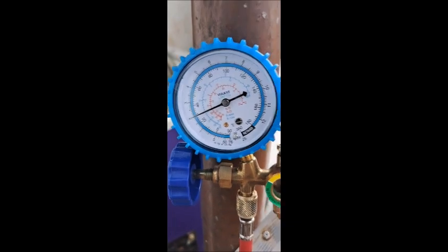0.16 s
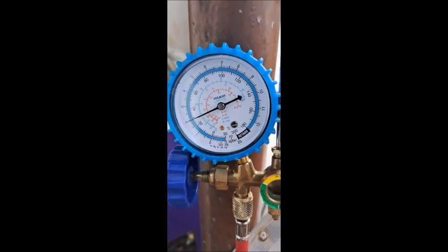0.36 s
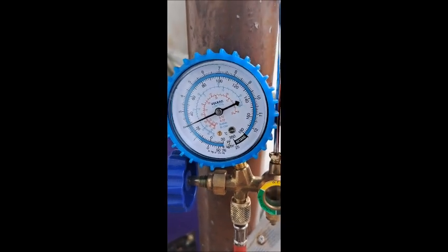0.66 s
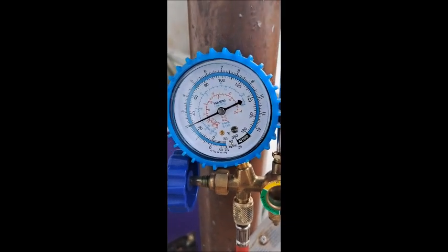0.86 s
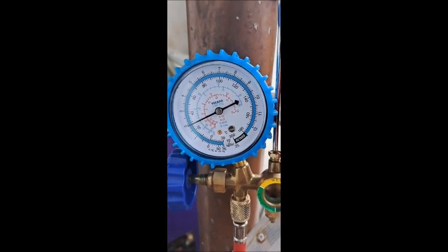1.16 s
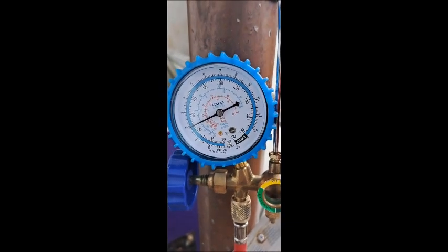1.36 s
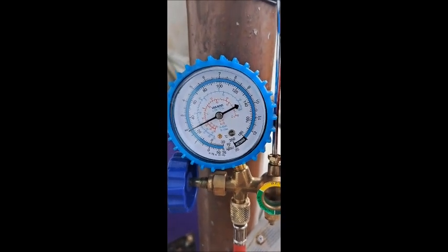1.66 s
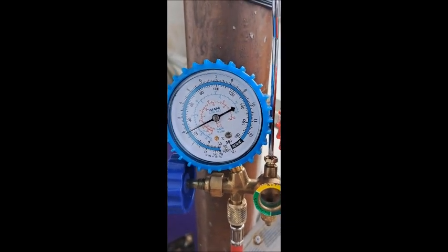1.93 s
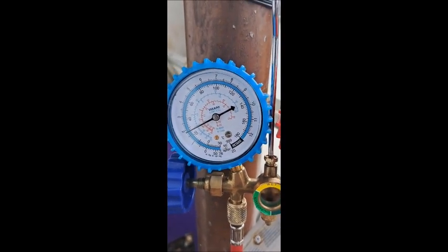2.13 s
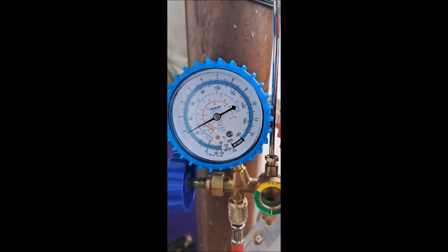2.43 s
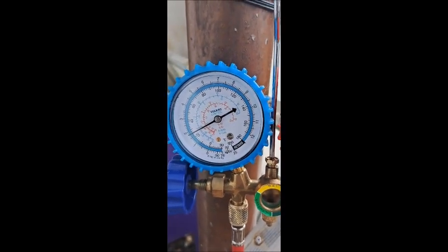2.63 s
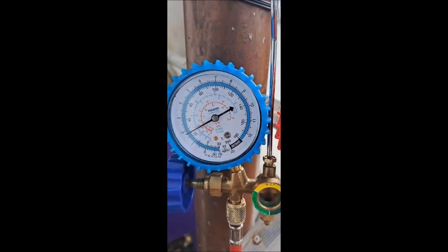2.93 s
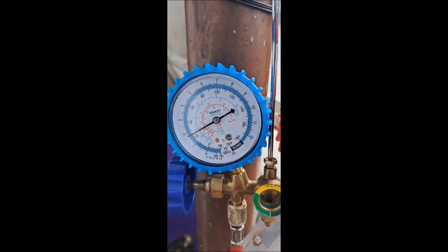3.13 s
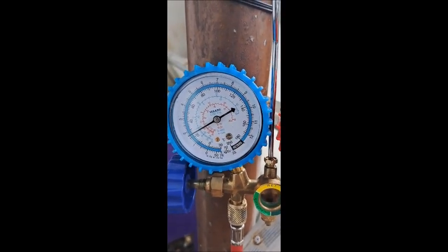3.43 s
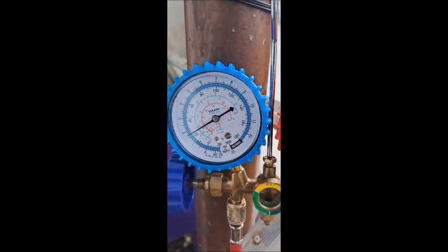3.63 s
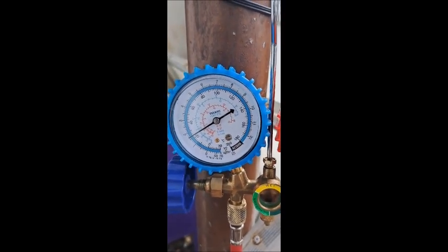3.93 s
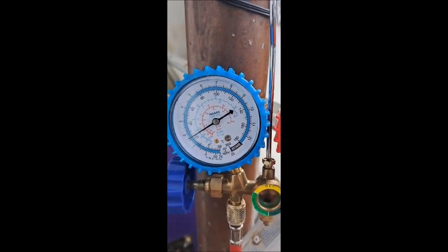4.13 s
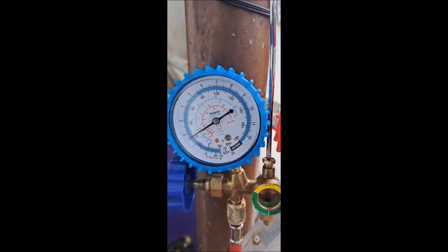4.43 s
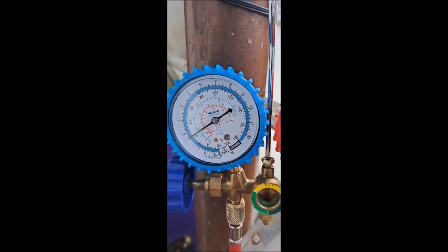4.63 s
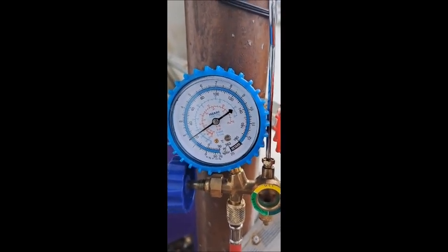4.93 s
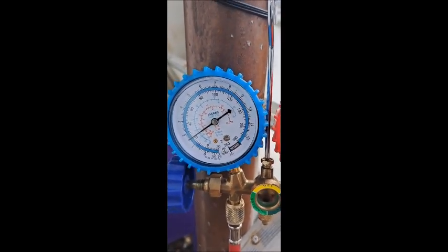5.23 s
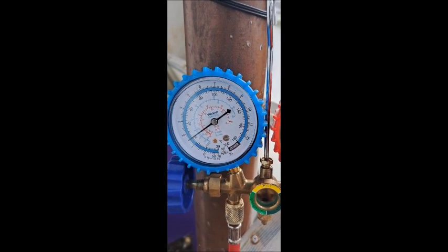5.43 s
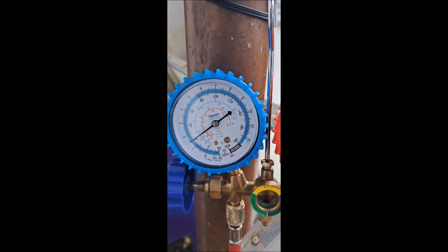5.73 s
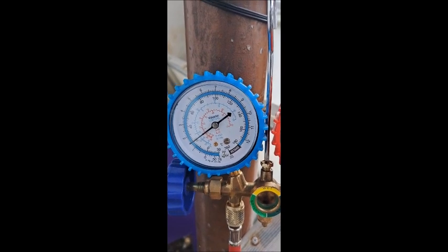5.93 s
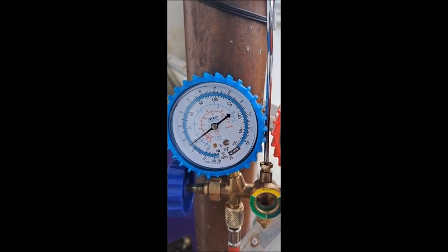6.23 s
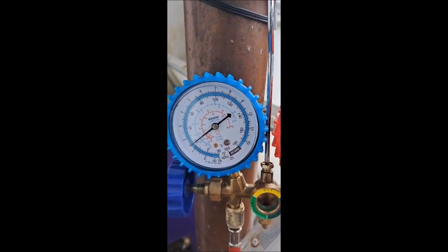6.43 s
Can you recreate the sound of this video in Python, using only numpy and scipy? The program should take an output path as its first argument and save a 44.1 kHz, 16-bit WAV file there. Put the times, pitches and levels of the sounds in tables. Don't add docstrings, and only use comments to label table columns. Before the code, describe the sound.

A wide stereo microphone lies beside a small running freezer, with street noise coming from outside. From 0 seconds a heavy truck pulls away with a very deep, smooth boom near fifty hertz, rising slightly, while another low engine note sags and vanishes within half a second. The compressor hums low and steadily, two close tones beating slowly, with fine rapid valve ticking and faint gas hiss. Small metallic ticks and taps occur throughout, with short liquid gurgles, clustered around 2.4 to 3. At about 2.6 the truck shifts, its boom drops sharply, then surges near 4.4 and 4.9 to 5.2 before easing. A car approaches from 3.2, a gritty click at 3.75, its tyre hiss strongest around 4.25, gone by 5.2. Barely audible birds chirp near 2.6 and 5.7. The freezer's ticking and hiss strengthen towards the end, with a soft light knock at 6.46. Dull road roar continues throughout.

```python
import sys
import numpy as np
from scipy import signal
from scipy.fft import rfft, irfft, next_fast_len
from scipy.io import wavfile
from scipy.ndimage import uniform_filter1d

SR = 44100
rng = np.random.default_rng(int(sys.argv[2]) if len(sys.argv) > 2 else 0)


def convert_level_to_amplitude(level_db):
    exponent = np.asarray(level_db, float) / 20
    return 10 ** exponent


def generate_wav(sig):
    pcm = np.round(np.clip(np.atleast_2d(sig).T, -1, 1) * 32767).astype(np.int16)
    wavfile.write(sys.argv[1], SR, pcm)


N = 290178
TIME = np.arange(N) / SR
FREQ = np.fft.rfftfreq(2 * next_fast_len(N // 2 + 1025), 1 / SR)
SIZE = 2 * (len(FREQ) - 1)
SHAFT_HZ = 58.92

# centre_s, change_db, half_width_s
BOOM_DIPS = [(.125, -6, 0.035), (.38, -2.5, .05), (.77, -1.5, 0.038), (5.42, -2, 0.067), (5.85, 1.5, 0.041),
             (.92, -1, 0.034), (1.73, -0.5, 0.036), (1.66, 1, .04), (3.0, -2, 0.051), (3.43, -10, 0.047),
             (3.57, -14, 0.054), (4.62, -4.5, 0.027), (6.17, -10, 0.12)]


def truck():
    # start_s, start_hz (firing rate), goal_hz, climb_s, bend (shape of the climb, no unit)
    gears = [
        (0, 51.3, 59.37, 1.6, 1.027),
        (2.58, 47.73, 56.88, .9, 1.61),
    ]
    # centre_s, gained_hz, half_width_s
    pedal_pushes = [
        (2.9, 0.604, .25),
        (3.75, 0.91, 0.205),
        (4.35, 1.18, 0.203),
    ]
    # multiple of the firing rate, level_db
    overtones = [(3, -44)]
    # start_s, level_db
    throttle = [(0, -18), (.95, -20), (1.22, -15.5), (1.5, -17.5), (1.72, -15.5), (1.97, -18.5),
                (2.4, -18.5), (2.62, -31.5), (2.9, -32), (3.3, -38), (3.72, -29), (4.05, -33.5),
                (4.38, -18.5), (4.62, -31), (4.85, -17.5), (5.12, -17), (5.5, -24.5), (5.9, -25.5),
                (6.58, -26)]
    hz = 0
    for s, start_hz, goal_hz, climb_s, bend in gears:
        since = np.clip(TIME - s, 0, None)
        climbing_hz = goal_hz - (goal_hz - start_hz) * np.exp(-(since / climb_s) ** bend)
        hz = np.where(TIME >= s, climbing_hz, hz)
    unsteady_hz = hz * (0.0037 * walk(6.11))
    phase = tone(uniform_filter1d(hz, size=2048) + bumps(pedal_pushes) + unsteady_hz)
    wave = -np.cos(phase)
    for multiple, db in overtones:
        wave = wave + convert_level_to_amplitude(db + 4.4 * walk(4.5)) * np.sin(multiple * phase + 0.73 * walk(4.0))
    hidden_db = swell(start=0, attack=4.5, end=6.5, release=-5, gain_db=-17)
    exhaust_db = -44 + hidden_db + 1.5 * walk(2.1)
    exhaust = np.sqrt(2) * convert_level_to_amplitude(exhaust_db) * np.sin(2 * phase + 0.62 * walk(2.7))
    boom_db = curve(throttle) + bumps(BOOM_DIPS) + 0.4 * walk(11.0)
    return np.sqrt(2) * convert_level_to_amplitude(boom_db) * wave + exhaust


def coasting():
    # from_hz, to_hz, level_db, phase_lead_rad
    low_notes = [
        (46, 44, -30.5, 0.033),
        (167.3, 153.5, -37, 0.88),
    ]
    glide_s, fade_db_per_s, gone_s = 0.18, -26, 0.43
    fade_db = fade_db_per_s * TIME - 150 * np.clip(TIME - gone_s, 0, None)
    out = 0
    for from_hz, to_hz, db, lead in low_notes:
        hz = to_hz + (from_hz - to_hz) * np.exp(-TIME / glide_s)
        out = out + np.sqrt(2) * convert_level_to_amplitude(db + fade_db) * np.sin(tone(hz, lead))
    return out


def compressor():
    # start_s, pressure (0 to 1)
    pressure_points = [
        (0, 0.55),
        (2.5, 0.26),
        (3.5, 0.3),
        (4.2, 0.78),
        (5, 0.75),
        (5.55, 0.75),
        (5.8, 0.87),
        (6.15, 0.94),
    ]
    pressure = curve(pressure_points)
    surge_db = 26 * np.clip(TIME - 6.25, 0, None)
    near = hum() + singing_pipe() + valve_ticks(pressure, surge_db)
    return both(near) + gas_rush(pressure, surge_db)


def hum():
    # centre_s, change_db, half_width_s
    fan_swells = [
        (.4, 0, .4),
        (4.25, 1.5, 0.26),
        (5.2, -0.5, .3),
        (6.0, 5, .3),
    ]
    # start_s, attack_s, end_s, release_s, gain_db
    panel_songs = [
        (0.32, 0.96, 2.8, 0.31, 5),
        (2.9, 0.38, 3.63, 0.21, 12),
        (4.8, 0.37, 5.5, 0.23, 6.5),
        (5.9, 0.34, 7.6, .2, 8),
    ]
    # centre_s, change_db, half_width_s
    panel_rattles = [(.5, 6, .06), (1.1, 6, 0.16), (1.4, -9, .06), (1.53, 8, 0.061), (.85, 4.5, .1),
                     (1.75, -0.5, 0.085), (2.0, -2, .08), (2.25, 4, 0.046), (2.63, 4, 0.075),
                     (2.75, -4, .04), (2.86, 5, .04), (2.97, -15.5, 0.066), (3.1, 5.5, .08),
                     (3.5, 4, 0.052), (5.25, 5, .05), (5.45, 4, .05), (5.65, -10, .08)]
    # centre_s, change_db, half_width_s
    shaft_swells = [
        (2.82, 10.5, 0.18),
        (3.3, 13.5, 0.16),
        (2.78, 2, 0.078),
        (3.65, 2, 0.11),
    ]
    # start_s, attack_s, end_s, release_s, gain_db
    lean_in = (3.44, 0.49, 4.83, 0.99, 3.1)
    mains = 2 * np.pi * 120.015 * TIME
    fan = tone(124.83 + 0.092 * TIME)
    warming_db = -5 * np.exp(-TIME / 2.8)
    mains_db = -39 + warming_db + 0.3 * walk(1.8)
    mains_tone = convert_level_to_amplitude(mains_db) * np.sin(mains)
    buzz_db = mains_db - 10.0 + 2.5 * walk(4.17)
    buzz = convert_level_to_amplitude(buzz_db) * np.sin(2 * mains - 0.6 + 0.3 * walk(3.0))
    fan_tone = -convert_level_to_amplitude(-41.5 + bumps(fan_swells)) * np.sin(fan)
    panel_db = sum(swell(*row) for row in panel_songs) + bumps(panel_rattles)
    overtone = convert_level_to_amplitude(-52.5 + panel_db) * np.sin(2 * fan + 0.8)
    shaft_db = -41.5 + bumps(BOOM_DIPS + shaft_swells) + 1.5 * walk(3.0)
    shaft = convert_level_to_amplitude(shaft_db) * np.sin(2 * np.pi * SHAFT_HZ * TIME)
    return np.sqrt(2) * (convert_level_to_amplitude(swell(*lean_in)) * (mains_tone + fan_tone) + buzz + overtone + shaft)


def valve_ticks(pressure, surge_db):
    # centre_hz, width_hz, level_db
    shell_modes = [(2480, 120, 3.5), (2720, 160, 3), (2943, 290, 2.5), (3320, 84, -3), (3990, 140, -6)]
    turns = np.arange(0, TIME[-1], 1 / SHAFT_HZ)
    clicks = np.zeros(N)
    clicks[np.round(turns * SR).astype(int)] = convert_level_to_amplitude(2.3 * rng.standard_normal(len(turns)))
    shell = 0
    for hz, width, db in shell_modes:
        shell = shell + convert_level_to_amplitude(db) * ring(ring(clicks, hz, width), hz, width)
    level_db = -73.5 + 19.5 * pressure - 2 * surge_db
    return shell / shell.std() * convert_level_to_amplitude(level_db)


def gas_rush(pressure, surge_db):
    # pitch_hz, level_db
    hiss_colour = [(1900, -9.5), (2250, -5), (2480, 2.5), (2750, -8), (3100, -8.5), (3500, -19)]
    level_db = -63.5 + 7 * pressure + surge_db
    return diffuse(hiss_colour, flicker_db=-0.5, rate=12.0) * convert_level_to_amplitude(level_db)


def singing_pipe():
    # centre_s, change_db, half_width_s
    pipe_swells = [(.9, 3, 0.25), (2.5, 4, 0.14), (3.25, 9, 0.16), (3.85, 8, 0.075), (4.3, 7.5, .25),
                   (4.85, 12, 0.11), (5.6, 7.5, 0.26)]
    song = ring(rng.standard_normal(N), hz=441.7, width=3.9)
    return convert_level_to_amplitude(-52 + bumps(pipe_swells)) * song / song.std()


def gurgles():
    # start_s, length_s, start_hz, end_hz, level_db
    flutter_notes = [(.1, .2, 1700, 1680, -53), (.42, .45, 1190, 1220, -50), (2.415, .065, 1230, 1295, -44),
                     (2.54, .035, 1150, 1200, -44), (2.858, .035, 1030, 1060, -43), (2.885, .04, 1070, 1110, -48),
                     (2.77, .04, 1060, 1200, -48), (3.0, .045, 690, 670, -43), (3.49, .04, 1100, 1130, -45),
                     (5.37, .04, 1180, 1210, -46)]
    return glides(flutter_notes, left_db=-3.0, right_db=0.1) * convert_level_to_amplitude(2.5 * walk(70.0) - 1)


def car():
    # start_s, tyres_db, spray_db
    passing = [
        (3.2, -54, -62),
        (3.47, -45, -56),
        (3.58, -47, -62),
        (3.74, -42, -59),
        (3.86, -42.5, -58),
        (4.25, -38.5, -55),
        (4.5, -50, -65),
        (4.92, -51, -67),
        (5.2, -86, -92),
    ]
    # pitch_hz, level_db
    tyre_colour = [(600, -12.5), (950, -8), (1070, -1.5), (1160, -2.5), (1280, -10.5), (1450, -10.5),
                   (1700, -18.5), (2200, -22.5)]
    # pitch_hz, level_db
    spray_colour = [(1800, -6), (3000, -5), (4500, 4.5), (6000, -4.5), (7500, 6), (10000, -1.5),
                    (13000, -1), (15500, -4.5)]
    # start_s, attack_s, end_s, release_s, gain_db
    open_view = (3.73, 0.021, 4.4, 1.1, 6.5)
    tyres = diffuse(tyre_colour, flicker_db=1.5, rate=16.0) * convert_level_to_amplitude(curve(passing))
    port_db = np.array([[1.5], [-0.6]])
    spray_db = curve(passing, column=2) + swell(*open_view) + 1.3 * walk(70.0) + port_db
    spray = diffuse(spray_colour, flicker_db=-0.3, rate=16.0)
    return tyres + spray * (convert_level_to_amplitude(spray_db) + grit())


def grit():
    # start_s, length_s, level_db
    scuffs = [(3.736, 0.0058, -46), (3.766, 0.008, -49), (3.849, .002, -45), (3.956, .004, -51),
              (4.048, .003, -52), (4.071, .004, -50), (4.185, .004, -48), (4.225, .004, -50),
              (6.263, .004, -58), (6.069, .004, -54), (6.472, 0.0036, -48)]
    out = 0
    for s, length, db in scuffs:
        since = np.clip(TIME - s, 0, None)
        out = out + convert_level_to_amplitude(db) * (TIME > s) * np.exp(-(since / length) ** 2)
    return out


def knock():
    # start_s, peak_db, length_s
    pushes = [(6.4604, -16.5, 0.0013)]
    out, t = np.zeros(N + 8192), TIME[:8192]
    for s, db, push in pushes:
        shape = np.sin(np.pi * np.clip(t / push, 0, 1)) ** 2
        overlap = np.roll(shape, int(0.8 * push * SR))
        rebound = np.roll(shape, int(1.1 * push * SR))
        out[int(s * SR):][:len(t)] += convert_level_to_amplitude(db) * (shape + 0.23 * overlap - 0.23 * rebound)
    return out[:N]


def metal_ticks():
    # start_s, peak_db
    tick_events = [(.072, -44.5), (.871, -47), (1.29, -51), (1.913, -50), (2.031, -48), (2.313, -44.5),
                   (2.711, -41), (2.832, -47), (3.482, -52), (4.569, -49), (4.806, -50)]
    # pitch_hz, level_db, fade_s (time to fall 60 dB)
    part_modes = [(2550, -4, 0.015), (3600, 3, 0.017), (4400, 1, 0.015)]
    out = np.zeros(N + 8192)
    for s, db in tick_events:
        for hz, mode_db, t60 in part_modes:
            out[int(s * SR):][:8192] += convert_level_to_amplitude(db + mode_db) * struck(hz, t60)
    return both(out[:N]) * convert_level_to_amplitude(np.array([[-3.0], [0]]))


def taps():
    # start_s, peak_db, pitch_hz, fade_s (time to fall 60 dB)
    tap_events = [(.588, -51, 3100, .02), (.710, -49, 3120, .015), (.789, -52, 3080, .015),
                  (.990, -51, 3130, .015), (2.704, -40, 660, .04), (2.655, -44, 1220, .03),
                  (1.028, -40.5, 4430, .022), (1.029, -50, 3560, .02), (1.29, -46, 1600, .015),
                  (2.712, -48, 4450, .02), (4.8, -48, 2430, .07), (3.764, -38.5, 1680, .018),
                  (3.766, -37, 1890, .018), (3.768, -44, 4900, .01), (3.79, -43, 3580, 0.025)]
    out = np.zeros(N + 8192)
    for s, db, hz, t60 in tap_events:
        out[int(s * SR):][:8192] += convert_level_to_amplitude(db) * struck(hz, t60)
    return out[:N] * convert_level_to_amplitude(np.array([[-4.0], [0]]))


def birds():
    # start_s, length_s, start_hz, end_hz, level_db
    chirps = [
        (2.537, .02, 3380, 3380, -54),
        (2.587, 0.026, 3390, 3370, -53),
        (5.672, .02, 3430, 3400, -57),
        (5.697, 0.059, 3380, 3700, -60),
        (5.757, 0.02, 3405, 3470, -57),
    ]
    return glides(chirps, left_db=7.0, right_db=-6.0)


def faint_low_notes():
    # start_s, length_s, start_hz, end_hz, level_db
    sliding_notes = [(3.6, .5, 225, 223, -41), (3.7, .4, 249, 243, -40), (4.05, .6, 241, 236, -40),
                     (2.2, .6, 244, 246, -43), (5.0, .6, 242, 251, -42), (.6, .8, 238, 240, -44),
                     (.9, .6, 388, 382, -45), (0, .35, 424, 427, -45), (2.7, .55, 115, 117, -46),
                     (5.0, 1.5, 157, 180, -44), (5.2, .6, 178, 182, -44), (6.1, .48, 180, 186, -42),
                     (3.8, .5, 104, 105, -47)]
    return glides(sliding_notes, left_db=0.0, right_db=0.1)[0]


def street():
    # centre_s, change_db, half_width_s
    street_swells = [(.3, -1.5, 0.13), (.65, 0, 0.17), (1.9, -1.5, 0.44), (5.95, -1, .2), (2.45, 2.5, 0.22),
                     (4.15, 5, 0.47), (4.78, 3.5, 0.25)]
    # pitch_hz, level_db
    roar_colour = [(25, -11), (45, 2.5), (66, 7.5), (80, 1), (100, 0.5), (160, 0), (195, -2.5), (235, 4.5),
                   (290, -3), (400, -3), (440, -3.5), (490, -5), (800, -13.5), (1500, -40.5)]
    # pitch_hz, level_db
    tyre_colour = [(500, -3), (900, 0), (1080, -1.5), (1150, -1.5), (1270, 1), (1450, -4), (1700, -10.5),
                   (2400, -13.5), (3200, -18), (5000, -25.5)]
    # pitch_hz, level_db
    spray_colour = [(1500, 2.5), (3000, -2), (5000, -0.5), (8000, -5.5), (12000, -8), (15500, -10.5)]
    traffic_db = bumps(street_swells)
    roar = diffuse(roar_colour, flicker_db=1.2, rate=8.0) * convert_level_to_amplitude(0.51 * traffic_db - 35)
    tyres = diffuse(tyre_colour, flicker_db=1.2, rate=14.0) * convert_level_to_amplitude(0.92 * traffic_db - 45)
    spray = diffuse(spray_colour, flicker_db=1.45, rate=30.0) * convert_level_to_amplitude(0.56 * traffic_db - 52.5)
    return roar + tyres + spray


def diffuse(colour, flicker_db, rate):
    # pitch_hz, share heard alike (0 to 1), left_behind_right_rad
    likeness = [(60.4, 1, -1.5), (175, 0.89, 0.56), (260, 0.88, 0.32), (427, 0.84, 0.99), (680, 0.84, 1.5),
                (968, 0.52, 3), (950, 0.18, 5), (1405, 0.68, 4), (1480, 0.62, 4.5), (2270, 0.27, 5),
                (3010, 0.2, 11), (3660, 0.2, 9.5), (15100, .05, 32.5)]
    alike = np.clip(over_hz(likeness), 0, 1)
    behind = np.exp(-1j * np.outer([1, 0], over_hz(likeness, column=2)))
    shared = rfft(rng.standard_normal(SIZE)) * behind
    apart = rfft(rng.standard_normal((2, SIZE)))
    octave = np.log2(FREQ + 1)
    first, last = np.log2(colour[0][0]), np.log2(colour[-1][0])
    slope_db = -12 * np.abs(np.clip(octave, first, last) - octave)
    mixed = np.sqrt(alike) * shared + np.sqrt(1 - alike) * apart
    spectrum = mixed * convert_level_to_amplitude(over_hz(colour) + slope_db)
    centres = np.arange(np.floor(max(first, 6)), last + 1)
    inside = np.clip(octave, centres[0], centres[-1])
    out = 0
    for centre in centres:
        part = np.clip(1 - np.abs(inside - centre), 0, 1)
        out = out + irfft(spectrum * part, SIZE)[:, :N] * convert_level_to_amplitude(flicker_db * walk(rate))
    return out / np.sqrt(np.mean(out ** 2))


def glides(rows, left_db, right_db):
    out = np.zeros(N)
    for s, length, start_hz, end_hz, db in rows:
        along = np.linspace(0, 1, int(length * SR))
        phase = tone(start_hz + (end_hz - start_hz) * along)
        out[int(s * SR):][:len(along)] += convert_level_to_amplitude(db) * np.sin(np.pi * along) * np.sin(phase)
    return out * convert_level_to_amplitude(np.array([[left_db], [right_db]]))


def struck(hz, t60):
    t = TIME[:8192]
    burst = rng.standard_normal(len(t)) * np.exp(-t / 0.011)
    crack = ring(burst, hz, 0.065 * hz)
    dying = np.sin(2 * np.pi * hz * t) * np.exp(-np.log(1000) * t / t60)
    y = 0.7 * crack / np.abs(crack).max() + dying
    return y / np.abs(y).max()


def ring(x, hz, width):
    return signal.lfilter(*signal.iirpeak(hz, hz / width, SR), x)


def both(x):
    lag = 20
    left = np.concatenate([np.full(lag, x[0]), x[:-lag]])
    return np.array([left, x])


def tone(hz, lead=0):
    return 2 * np.pi * np.cumsum(hz) / SR + lead


def walk(rate):
    steps = np.repeat(rng.standard_normal(int(rate * N / SR) + 2), 16)
    smooth = uniform_filter1d(uniform_filter1d(steps, size=16), size=16)
    return 1.3 * np.interp(TIME * rate * 16, np.arange(len(smooth)), smooth)


def bumps(rows):
    return sum(height * np.exp(-((TIME - s) / width) ** 2) for s, height, width in rows)


def swell(start, attack, end, release, gain_db):
    rise = (TIME - start) / attack
    fall = 1 - (TIME - end) / release
    return gain_db * np.clip(np.minimum(rise, fall), 0, 1)


def curve(rows, column=1):
    rows = np.array(rows)
    return np.interp(TIME, rows[:, 0], rows[:, column])


def over_hz(rows, column=1):
    rows = np.array(rows)
    return np.interp(np.log(FREQ + 1), np.log(rows[:, 0]), rows[:, column])


def scene():
    engines = both(truck() + coasting() + faint_low_notes())
    freezer = compressor() + gurgles()
    contacts = knock() + metal_ticks() + taps()
    return engines + freezer + car() + contacts + birds() + street()


def top_cut(x):
    return signal.sosfilt(signal.butter(12, 15790, fs=SR, output="sos"), x)


def record(dry):
    # pitch_hz, left_db, right_db
    ports = [(60, -0.27, 0.9), (125, -0.5, 1.5), (300, 0.2, 1.04), (1210, -2, 3.5), (2500, 0, 6),
             (4440, -3, 6), (6420, -4, 4), (7440, -4.5, 10), (8070, -18, 5), (8570, -3, -16),
             (8800, -9.5, -15), (9600, -6, -15.5), (10330, -6.5, 0), (12300, -5, 4), (15500, -14, 1)]
    colour = convert_level_to_amplitude(np.array([over_hz(ports), over_hz(ports, column=2)])) * (FREQ < 15800)
    padded = np.pad(dry, [(0, 0), (1024, SIZE - N - 1024)], mode="reflect")
    heard = irfft(rfft(padded) * colour, SIZE)[:, 1024:1024 + N]
    return top_cut(heard)


dry = scene()
out = record(dry)
generate_wav(out)
```